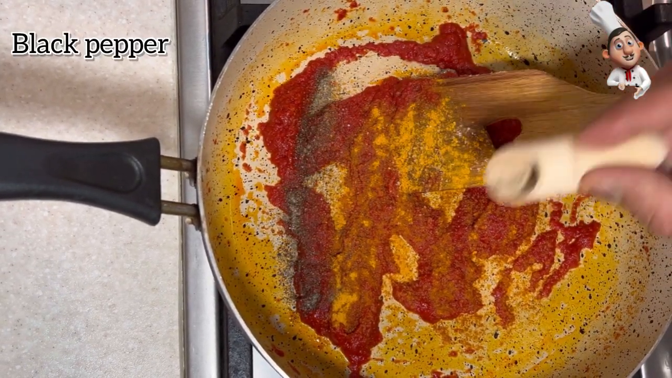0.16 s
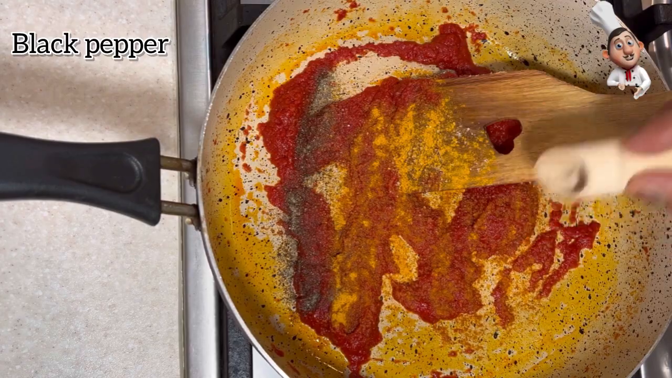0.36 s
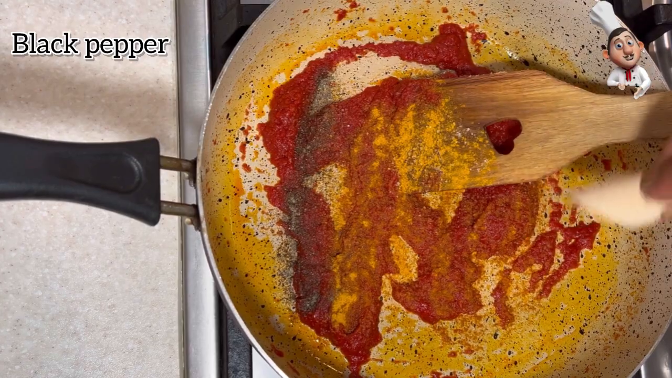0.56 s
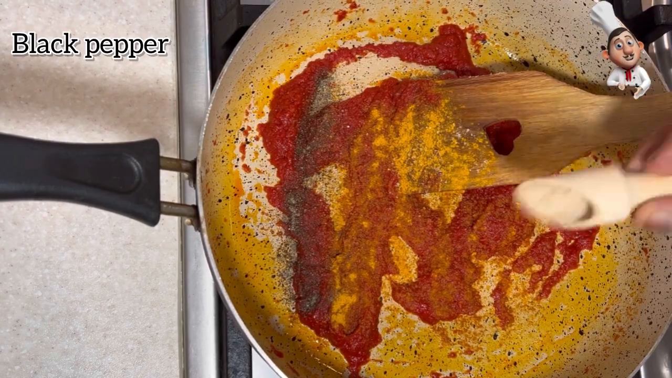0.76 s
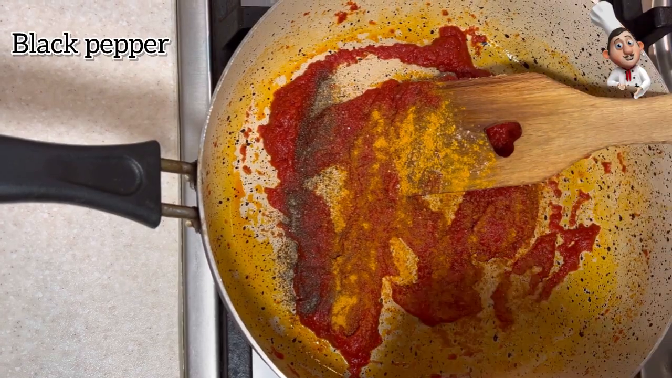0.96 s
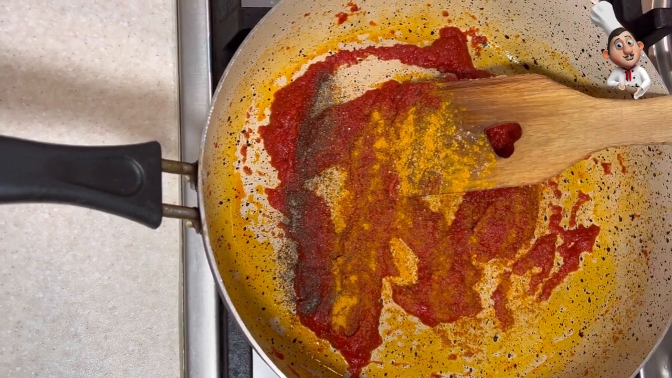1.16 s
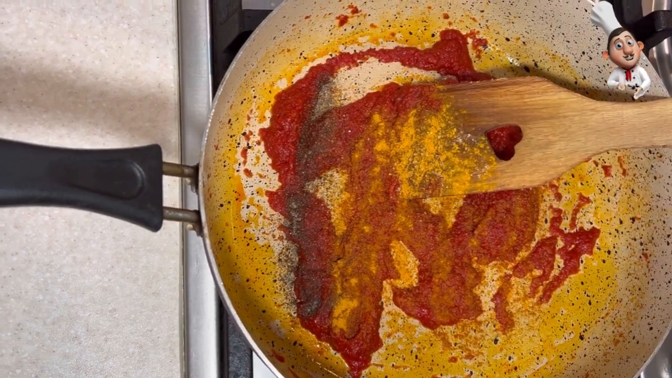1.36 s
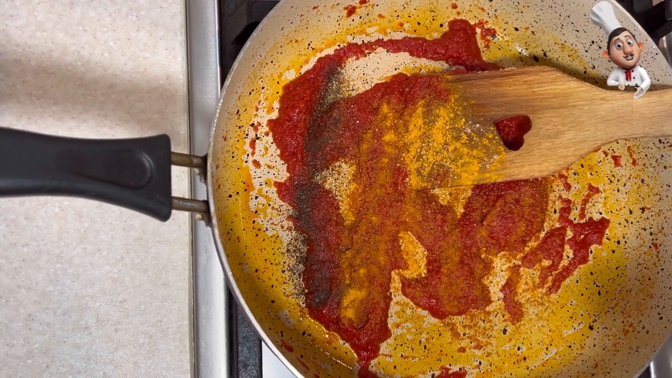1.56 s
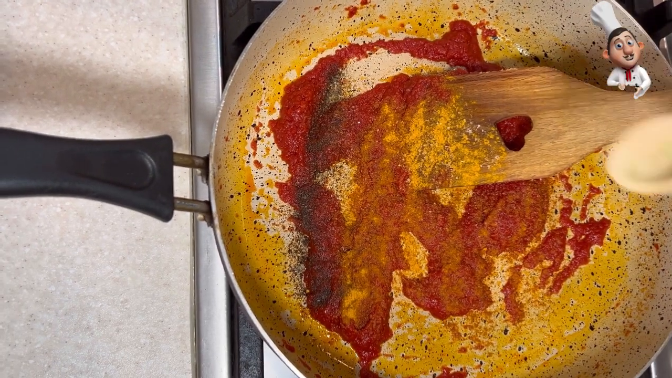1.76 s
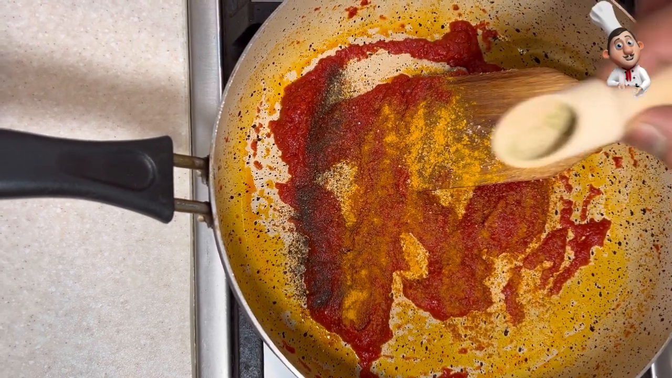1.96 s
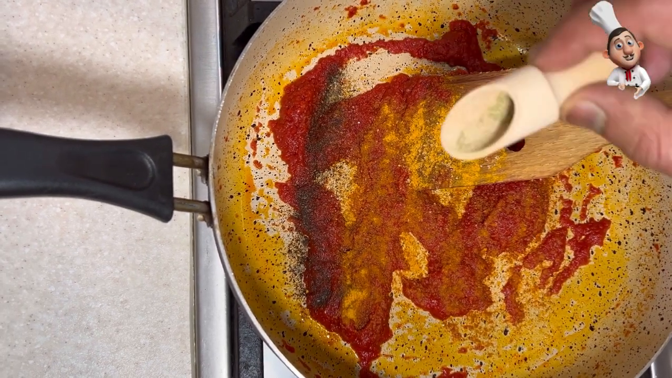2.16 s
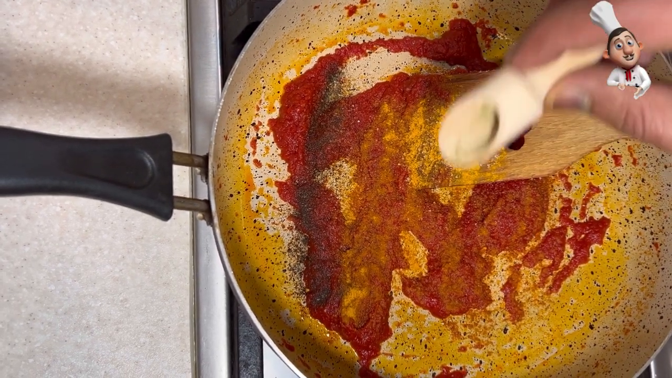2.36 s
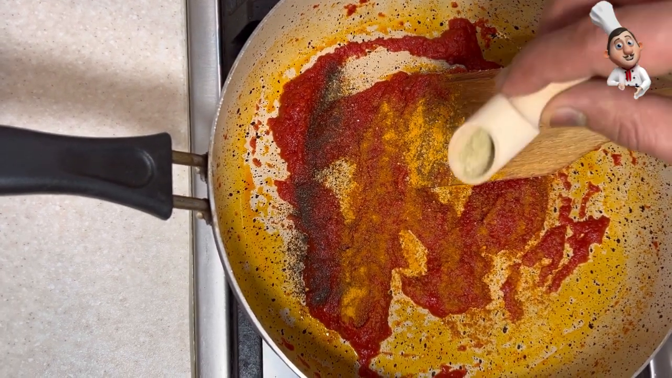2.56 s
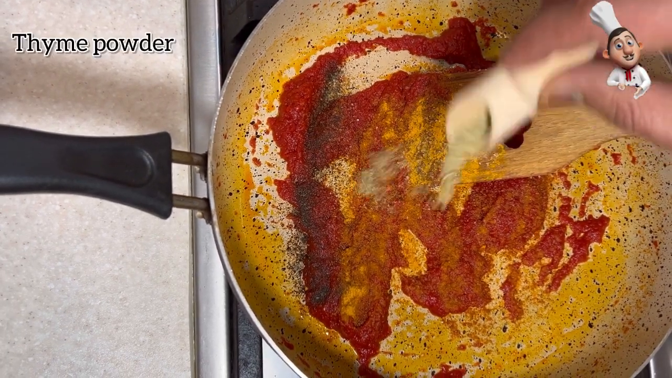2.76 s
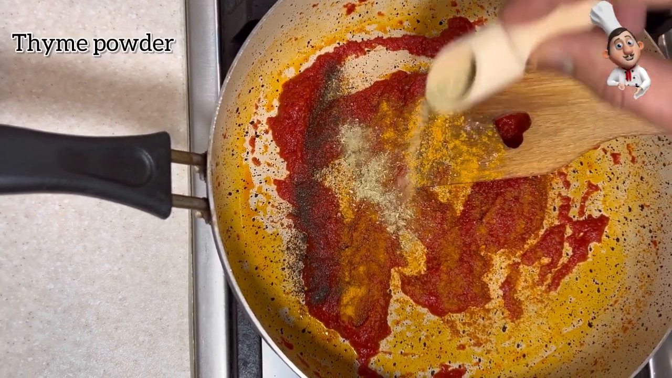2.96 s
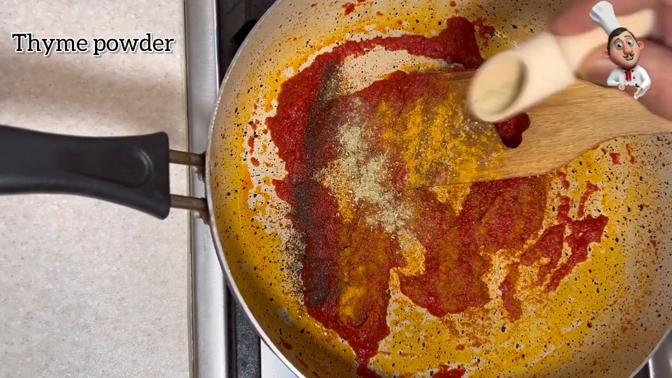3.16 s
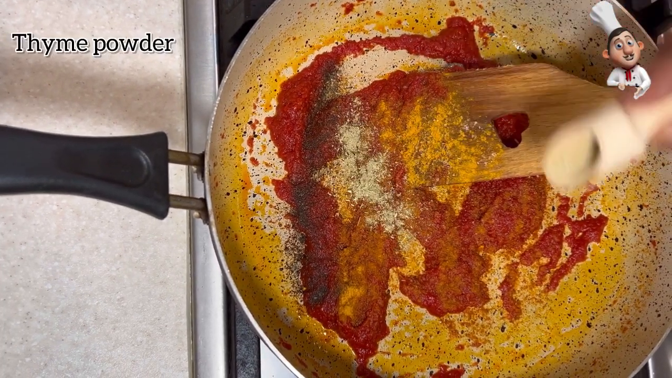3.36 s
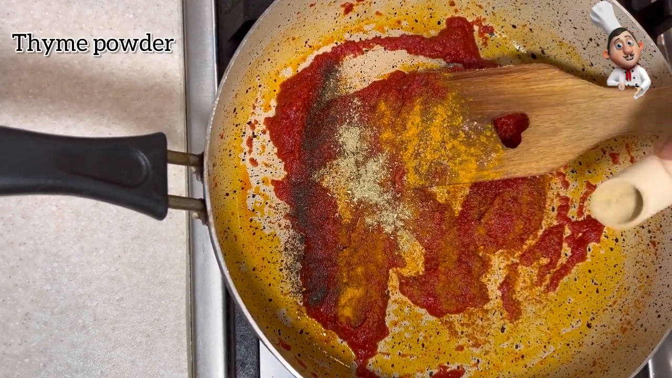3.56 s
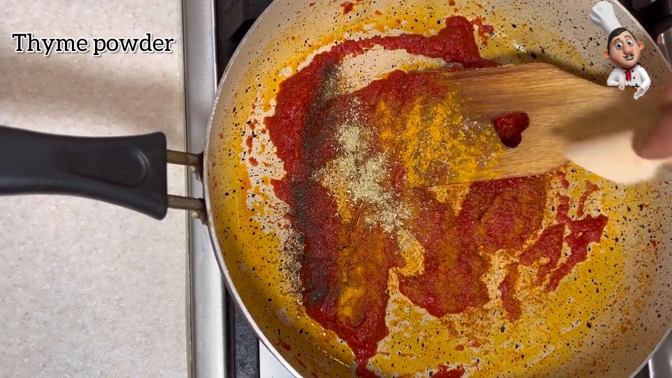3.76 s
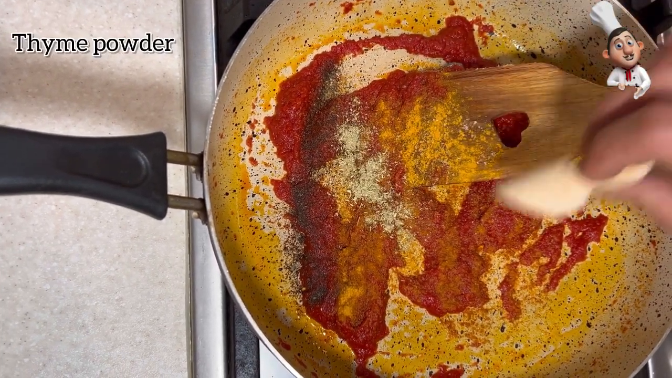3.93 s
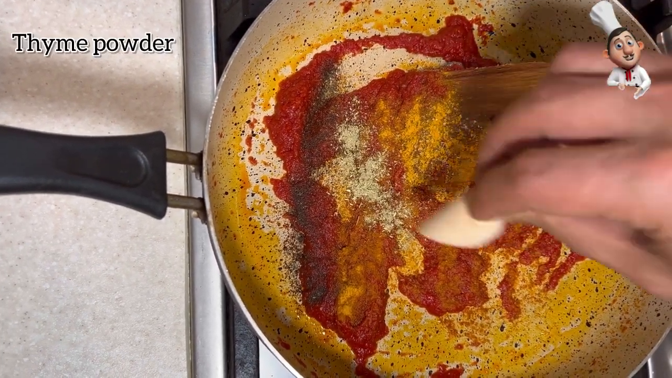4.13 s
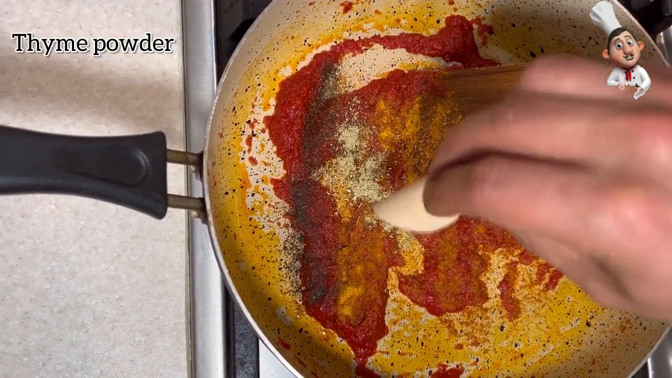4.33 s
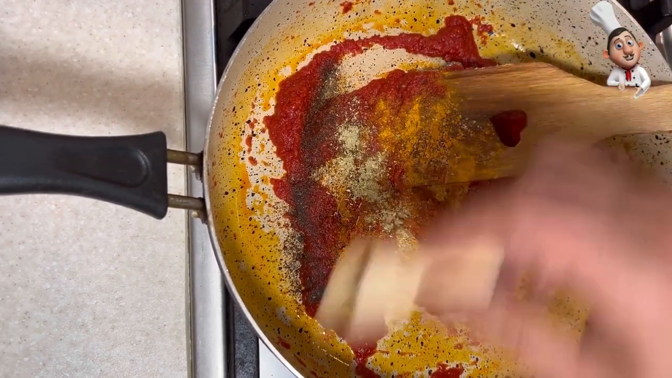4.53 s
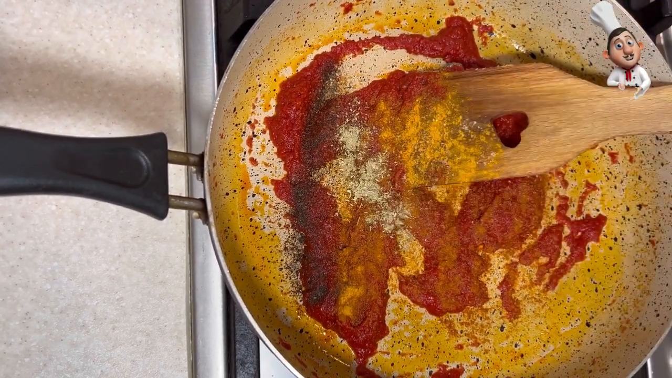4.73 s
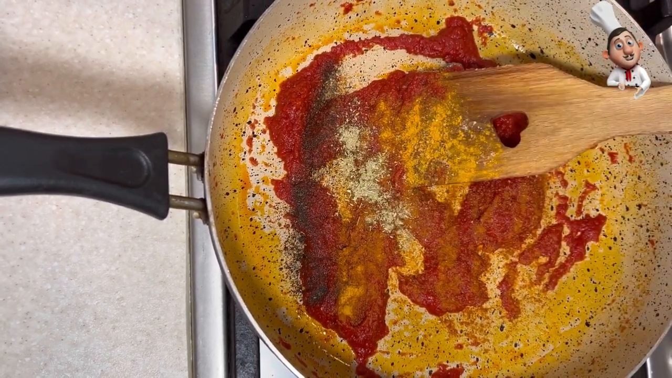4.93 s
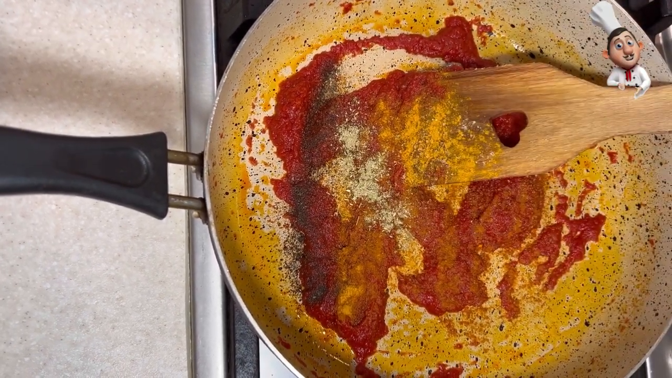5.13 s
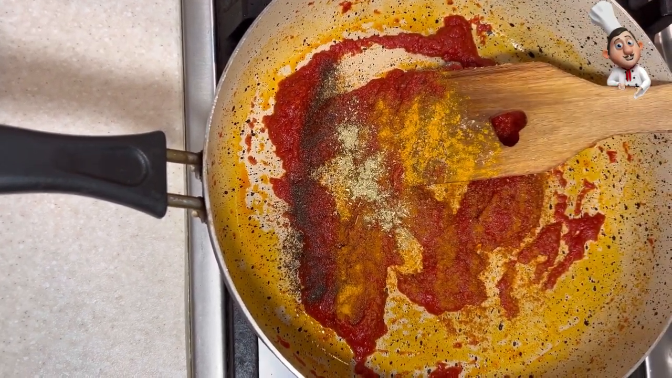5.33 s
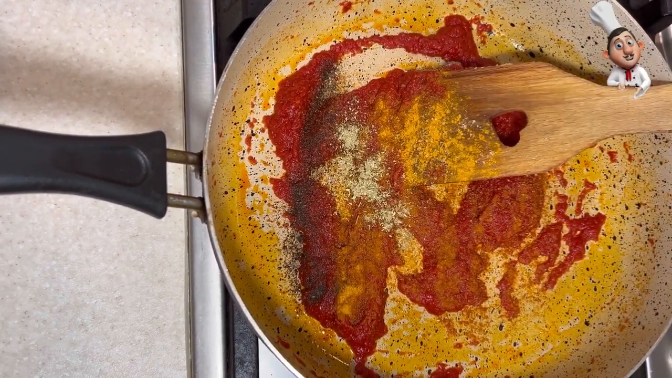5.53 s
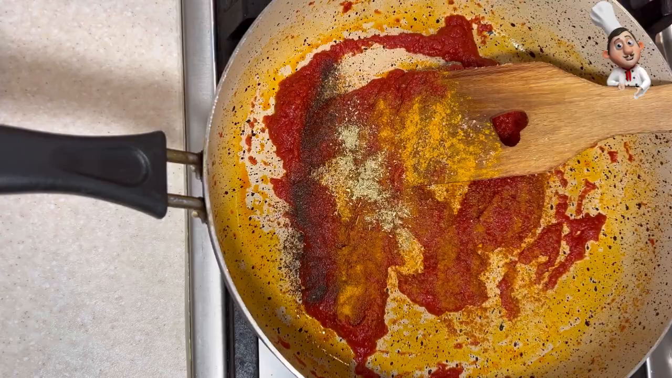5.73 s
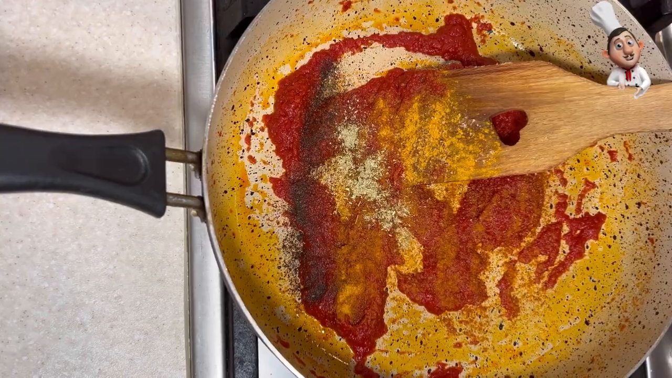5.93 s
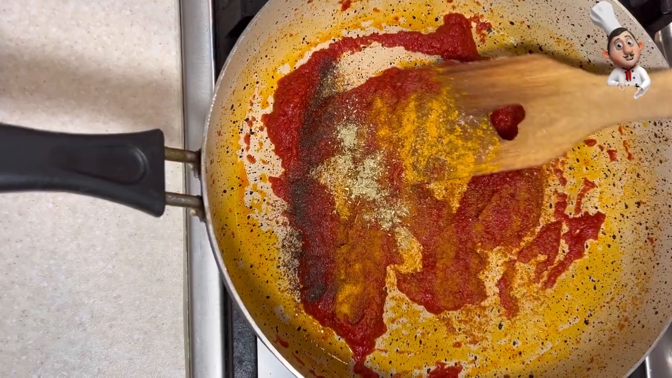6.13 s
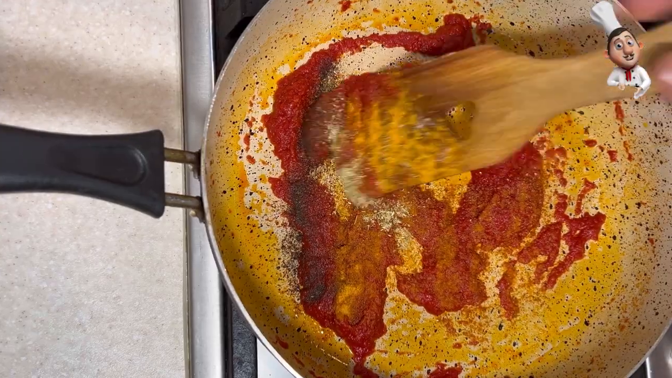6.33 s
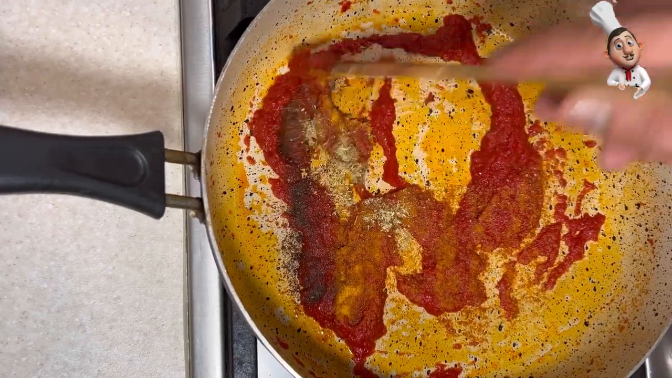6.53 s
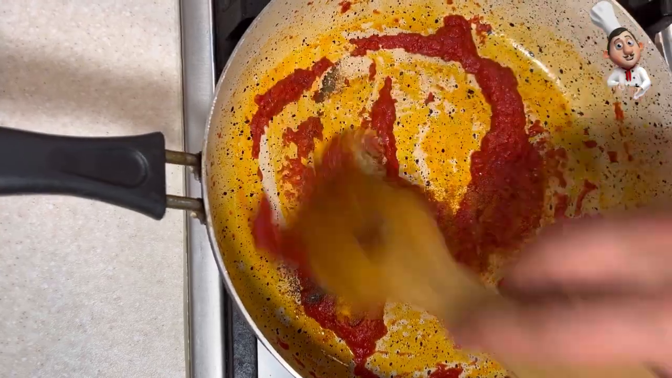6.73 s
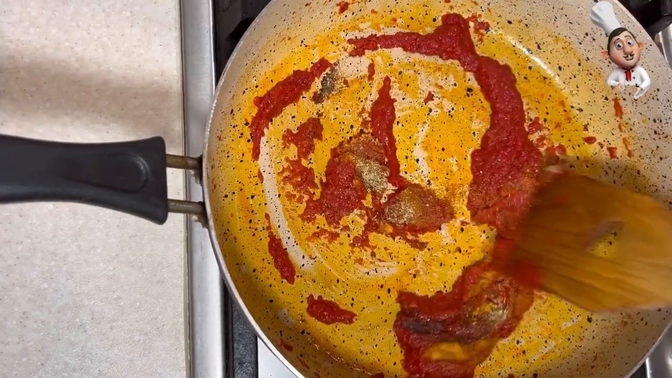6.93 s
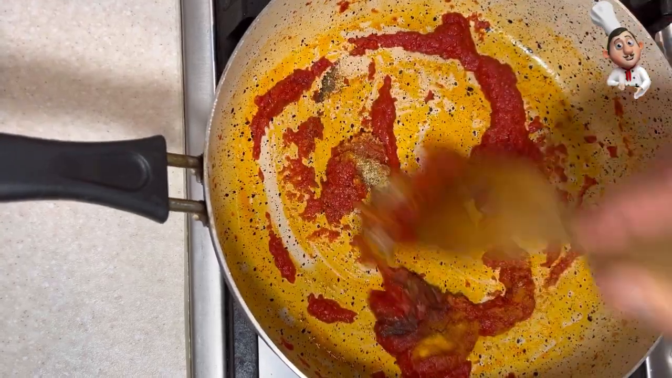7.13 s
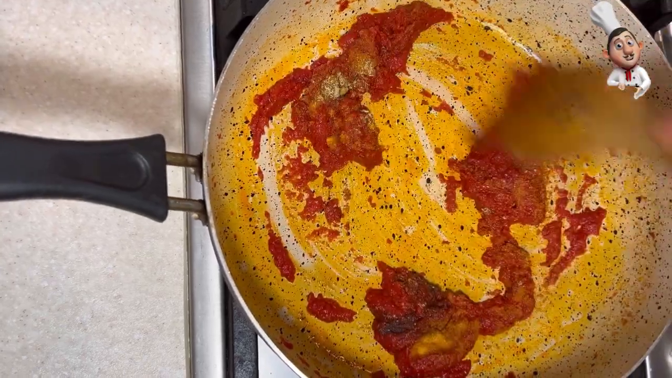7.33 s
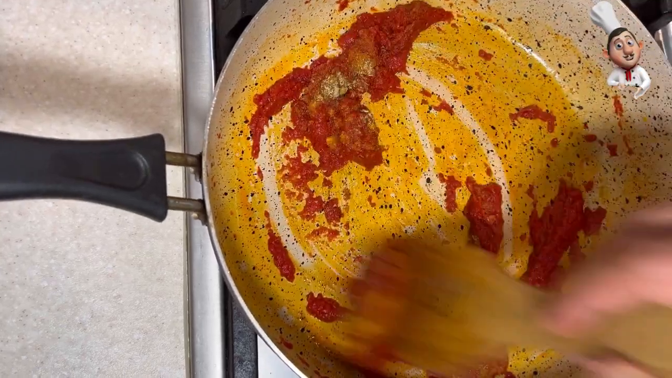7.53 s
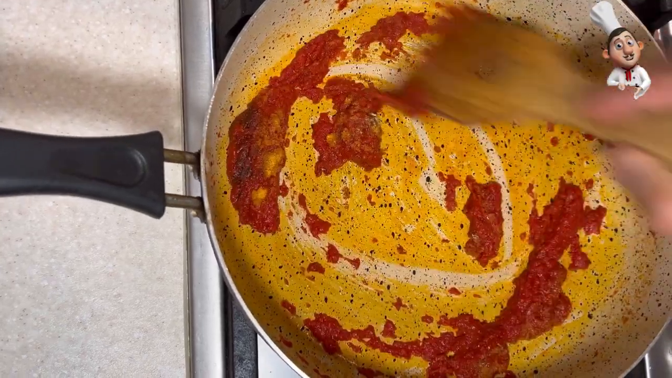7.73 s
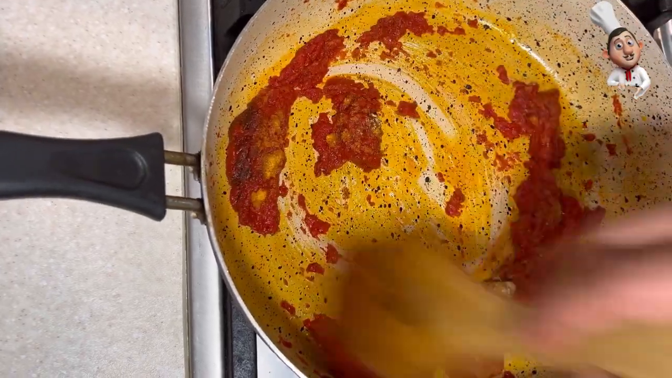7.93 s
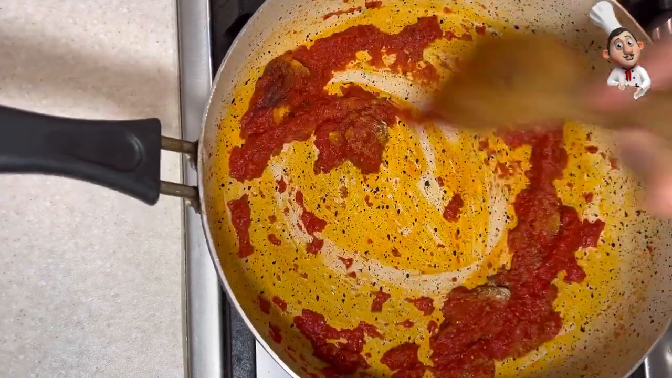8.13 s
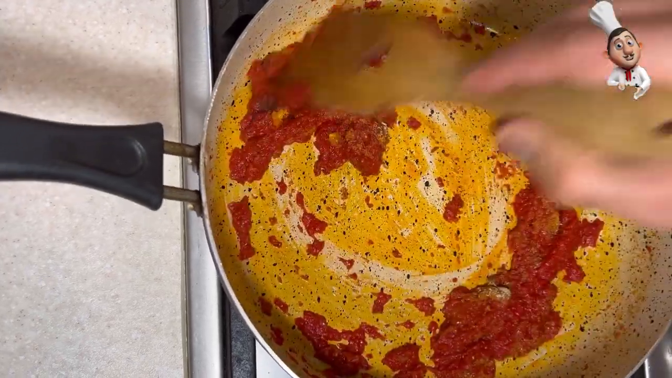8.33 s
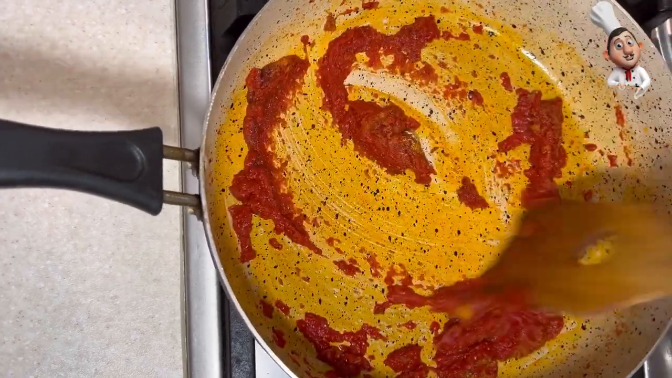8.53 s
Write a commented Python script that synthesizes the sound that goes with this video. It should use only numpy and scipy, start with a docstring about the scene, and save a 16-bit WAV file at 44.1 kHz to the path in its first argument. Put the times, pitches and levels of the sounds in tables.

```python
"""A wooden spatula knocks and scrapes through thick paste in a frying pan on a stove, close by.
Impacts and stick-slip friction excite the same damped pan modes; grit rasps under the blade, and the
rocking pan drives the stove top into a rumble. The stirring starts after about six seconds. Before it
only the kitchen is heard: a low drone and the hiss of tiny bubbles in oil, which both go on throughout,
and the clacks of a few things set down. Pan and clacks reverberate; two microphone ports pick it all up."""
import sys
import numpy as np
from scipy import signal
from scipy.fft import rfft, irfft
from scipy.io import wavfile
from scipy.ndimage import uniform_filter1d

SR = 44100
rng = np.random.default_rng(int(sys.argv[2]) if len(sys.argv) > 2 else 0)


def pcm_store(signal):
    """Save signal as 16-bit PCM."""
    levels = np.round(np.clip(np.atleast_2d(signal), -1, 1) * 32767)
    wavfile.write(sys.argv[1], SR, levels.astype(np.int16).T)


N = 383229

# spectrum of the drone: (frequency [Hz], relative density [dB])
DRONE_SPECTRUM = [(15, -56), (25, -9), (114, -3.5), (145, 2.5), (173, -21.5), (211, -9.5), (257, -18),
                  (313, -6.5), (397, -21), (566, -18.5), (663, -22), (1220, -27.5), (1400, -31.5),
                  (2170, -28.5), (2800, -31), (3640, -62), (6160, -120)]
# humps on that spectrum: (frequency [Hz], width [Hz], boost [dB])
DRONE_HUMPS = [(146, 39, 0), (299, 33, 4), (569.7, 10.6, 10), (2115, 45, 5.5)]
# spectrum of the frying hiss: (frequency [Hz], relative density [dB])
HISS_SPECTRUM = [(1180, -12.5), (2000, -14), (2180, -7.5), (2910, -10), (3340, -3.5), (4120, -1),
                 (5210, -2.5), (6470, 2.5), (9830, 0.5), (15100, 7), (16000, -17)]
# course of the hiss; turned paste fizzes harder: (time [s], level [dB])
HISS_LEVELS = [(0, -47), (3, -47), (4.3, -47.5), (5.3, -46.5), (6.2, -46.5), (6.6, -43.5), (6.95, -39),
               (7.2, -38.5), (7.7, -38.5), (8, -41.5), (8.69, -42.5)]
# pops of oil that stand out: (time [s], level [dB], pitch [Hz])
OIL_POPS = [(2.7305, -34, 8560), (2.8094, -37, 6660), (2.8594, -36, 11800), (3.0044, -35, 9010),
            (3.0394, -35, 7470), (3.2261, -36, 11300), (3.686, -35, 11800), (5.1173, -38, 12000),
            (6.6194, -32, 6590), (8.6657, -26, 8620)]
# things set down: (time [s], level [dB], pitch [Hz], spread [octaves], relative clink level [dB])
SET_DOWNS = [(1.6, -23, 460, 0.43, -60), (1.604, -31.5, 800, 0.7, -60), (1.623, -28.5, 420, 0.7, -60),
             (2.155, -36.5, 970, 0.89, -60), (5.201, -30.5, 1610, 0.68, -6), (5.221, -32, 1680, 0.68, -18),
             (5.289, -24.5, 1930, 0.75, -9.5), (5.304, -31, 2180, 0.96, -25),
             (5.344, -33.5, 1890, 0.88, -27)]
# their stronger resonances: (frequency [Hz], width [Hz], boost [dB])
CLACK_HUMPS = [(460, 70, 8), (800, 110, 10), (1400, 130, 9), (1800, 130, 9), (2200, 160, 10),
               (2950, 200, 6)]
# reverberation of the kitchen: (frequency [Hz], T60 [s])
REVERB_TIMES = [(200, 0.32), (1000, 0.43), (4000, 0.37), (12000, 0.62)]
# modes of the stove top: (frequency [Hz], width [Hz], relative level [dB])
STOVE_MODES = [(70, 4.4, -15.5), (96.2, 4.5, -6.5), (130.6, 24.6, -1), (148, 75, -23.5)]
# how hard the pan rocks: (time [s], drive level [dB])
ROCKING_LEVELS = [(6.24, -44), (6.28, -59), (6.36, -41), (6.62, -47), (6.64, -33), (6.73, -36), (6.74, -22),
                  (6.83, -28), (6.9, -34.5), (7.06, -33.5), (7.32, -58), (7.71, -43.5), (7.79, -29),
                  (7.8, -31.5), (8.03, -31.5), (8.05, -21), (8.4, -31), (8.44, -41), (8.5, -25.5),
                  (8.69, -36)]
# modes of pan and spatula, damped by the paste: (frequency [Hz], relative level [dB], T60 [s])
PAN_MODES = [(272, -13.5, 0.79), (376, -2.5, 0.1), (445, 5, 0.062), (589.5, -0.5, 0.081), (739, 0.5, 0.072),
             (772, 5, 0.044), (860, -27.5, 0.074), (950, 0, 0.027), (1138, -1.5, 0.05), (1235, -8, 0.068),
             (1607, -4.5, 0.039), (1724, -7, 0.06), (2108, -5.5, 0.073), (2330, -9.5, 0.052),
             (2700, -32, 0.058), (2940, -22, .05), (3250, -24, .05)]
# strokes of the blade: (time of peak [s], rise [s], fall [s], favoured pitch [Hz],
# low chatter level [dB], high chatter level [dB], rasp level [dB])
STROKES = [(6.36, .05, .12, 590, -47, -69, -45), (6.5, 0.02, 0.028, 680, -39.5, -65, -50),
           (6.612, 0.059, 0.044, 357, -56.5, -60, -48), (6.7, .03, 0.042, 390, -36, -63, -60),
           (6.813, 0.17, 0.07, 580, -29.5, -36, -32.5), (7.021, 0.032, 0.049, 720, -30.5, -32, -30.5),
           (7.075, 0.044, 0.094, 730, -21.5, -25, -34), (7.14, 0.19, .05, 740, -43, -47, -32),
           (7.235, .06, .1, 795, -42, -37, -32), (7.39, 0.067, 0.057, 500, -40.5, -36, -37),
           (7.49, 0.068, 0.08, 620, -33, -42, -38), (7.535, 0.06, 0.086, 610, -40.5, -32.5, -33.5),
           (7.63, 0.23, 0.098, 710, -61, -49, -39), (7.725, 0.015, 0.042, 405, -37, -42.5, -29.5),
           (7.799, 0.043, 0.067, 600, -28, -27, -20.5), (7.998, 0.055, 0.035, 423, -32, -39.5, -52),
           (8.043, .02, 0.076, 500, -38, -28.5, -30), (8.141, 0.024, 0.041, 434, -38, -47, -31),
           (8.26, 0.017, 0.045, 478, -32, -35.5, -44), (8.36, .04, 0.053, 453, -36, -51, -55),
           (8.39, .015, 0.081, 750, -52, -45, -39), (8.474, 0.098, 0.041, 715, -42, -29.5, -20),
           (8.51, .03, .04, 526, -24, -32.5, -46), (8.57, .02, 0.14, 483, -38.5, -43, -56)]
# spectrum of the rasp: (frequency [Hz], relative density [dB])
RASP_SPECTRUM = [(1500, -12), (2500, 0), (3400, -7), (4900, -7.5), (6500, -5.5), (8600, -3.5),
                 (10000, -9.5), (12000, -4.5), (14000, -6.5), (15200, -13)]
# humps on that spectrum: (frequency [Hz], width [Hz], boost [dB])
RASP_HUMPS = [(3380, 130, 7), (4080, 190, 8.5), (4880, 130, 13), (5620, 200, 10.5), (6410, 570, 9.5),
              (7850, 300, 4.5), (8760, 150, 7)]
# blows and small rubs of the spatula: (time [s], level [dB], pitch favoured by the spot touched [Hz], spread
# [octaves],
BLOWS = [(6.34, -36, 589, .59, -16, -6), (6.492, -34.5, 610, 0.18, -35.5, -17),
         (6.669, -26, 401, 1, -16, -25), (6.735, -10, 660, 1, -12, -1.5), (6.992, -20, 714, 0.83, -23, -14),
         (7.047, -19, 750, 0.29, -3, -16), (7.179, -26, 765, 0.51, -9, -8),
         (7.374, -33, 1110, 0.39, -16, -15), (7.399, -29.5, 565, .58, -5, -12),
         (7.449, -31, 759, 0.48, -6, -10), (7.475, -27.5, 590, 0.15, -15, -15),
         (7.517, -28.5, 590, 0.41, -6, -10), (7.706, -27.5, 390, .88, -14, -11),
         (7.72, -27, 388, 0.63, -11, 8.5), (7.767, -8.5, 696, 1, -27, -2), (7.869, -24, 821, .91, -14, -17),
         (7.924, -10.5, 490, 1, -18, -30), (8.033, -16.5, 720, 0.68, -4.5, -3),
         (8.086, -15.5, 774, 0.89, -8.5, -29), (8.17, -7, 656, 1, -20, -5), (8.199, -25, 759, .4, 1, -22),
         (8.226, -22.5, 775, 0.92, -11, -23), (8.246, -16.5, 460, 1, -17, -16),
         (8.286, -20, 456, 1, -15, -5.5), (8.332, -20.5, 452, 1, -5, -22), (8.483, -8.5, 580, 1, -7.5, -5),
         (8.55, -20, 401, 1, -10, -28), (8.638, -26, 468, .7, -2.5, -7), (8.678, -3, 670, 0.28, -32, -24)]
# likeness of noise at the two microphone ports: (frequency [Hz], correlation [0 to 1])
PORT_CORRELATION = [(60, 1.0), (150, .995), (350, .92), (1000, .8), (2100, .87), (2800, .35), (3500, .3),
                    (4800, .45), (5600, .8), (15000, .8)]
# level difference of the ports: (frequency [Hz], left minus right [dB])
PORT_LEVEL_GAP = [(150, 0), (280, -.9), (600, 1.4), (2500, .9), (5000, .5), (9000, -.2), (15000, 0)]
# phase difference of the ports: (frequency [Hz], lag of the left [rad])
PORT_PHASE_GAP = [(1000, 0), (2000, -.05), (2800, -.3), (4100, .2), (5500, 1.1), (7000, 1.3), (11000, 1.4),
                  (15500, 1.7)]


def amp(db):
    """Amplitude ratio of a level in decibels."""
    return 10 ** (np.asarray(db) / 20)


def unit_rms(x):
    """Normalisation to a mean square of one."""
    return x / np.sqrt(np.mean(x ** 2) + 1e-20)


def curve(points, hz):
    """Interpolation of a table on a log-frequency axis."""
    f, value = np.transpose(points)
    return np.interp(np.log(hz + 1), np.log(f + 1), value)


def humps(peaks, hz):
    """Sum of Lorentzian resonance humps, in dB."""
    return sum(db / (1 + (2 * (hz - f) / width) ** 2) for f, width, db in peaks)


def bell(hz, centre_hz, octaves):
    """Gaussian weight over log frequency."""
    return np.exp(-.5 * (np.log2(hz / centre_hz) / np.maximum(octaves, .01)) ** 2)


def add(mix, s, sound):
    """Superposition of a sound on the mix at s seconds."""
    part = mix[round(s * SR):][:len(sound)]
    part += sound[:len(part)]


def resonator(x, hz, width):
    """A damped two-pole oscillator, scaled to pass white noise at equal power."""
    r, w = np.exp(-np.pi * width / SR), 2 * np.pi * hz / SR
    response = signal.lfilter([0, r * np.sin(w)], [1, -2 * r * np.cos(w), r * r], x)
    return response * np.sqrt(4 * np.pi * width / SR)


def clicks(per_s, spread_db):
    """Shot noise: impulses of random time and sign, a few much larger than the rest."""
    size = amp(spread_db * np.minimum(rng.exponential(1, N), 5)) * rng.choice([-1., 1.], N)
    return unit_rms(size * (rng.random(N) < per_s / SR))


def wander(span, length=N):
    """Slow fluctuation: a moving average of noise over span samples."""
    return unit_rms(uniform_filter1d(rng.standard_normal(length), size=span))


def burst(noise, centre_hz, octaves, t60):
    """A band of noise in exponential decay."""
    hz = np.fft.rfftfreq(len(noise), 1 / SR) + 1
    band = irfft(rfft(noise) * bell(hz, centre_hz, octaves), len(noise))
    return unit_rms(band) * amp(-60 * np.arange(len(noise)) / SR / t60)


def filtered(x, gain, size):
    """Filtering by a complex gain over frequency, in frames of size samples."""
    hz, _, spectra = signal.stft(x, SR, nperseg=size)
    return signal.istft(spectra * gain(hz)[..., None], SR, nperseg=size)[1][..., :N]


def stereo(left, independent):
    """Partial coherence: the right port hears a share of the left's noise, plus noise of its own."""
    share = lambda hz: np.clip(curve(PORT_CORRELATION, hz), 0, 1)
    private = filtered(independent, lambda hz: np.sqrt(1 - share(hz) ** 2), size=1024)
    return np.array([left, filtered(left, share, size=1024) + private])


def drone(level_db=-46):
    """Stationary coloured noise: the low sound of the kitchen, with a few humps in its spectrum."""
    colour = lambda hz: amp(curve(DRONE_SPECTRUM, hz) + humps(DRONE_HUMPS, hz))
    noise = stereo(*rng.standard_normal((2, N)))
    return amp(level_db) * unit_rms(filtered(noise, colour, size=4096))


def frying(flicker_db=0.86, flat_above_hz=15200):
    """Shot noise of tiny bubbles in oil merges into a flickering hiss; a few single pops stand out."""
    fizz = stereo(clicks(per_s=9000, spread_db=2.0), clicks(per_s=9000, spread_db=7.3))
    colour = lambda hz: amp(curve(HISS_SPECTRUM, np.minimum(hz, flat_above_hz)))
    hiss = unit_rms(filtered(fizz, colour, size=512))
    level_db = np.interp(np.arange(N) / SR, *np.transpose(HISS_LEVELS)) + flicker_db * wander(1500)
    pops = np.zeros(N)
    for (s, db, hz), noise in zip(OIL_POPS, rng.standard_normal((len(OIL_POPS), 600))):
        add(pops, s, amp(db) * burst(noise, hz, octaves=0.51, t60=0.015) / 2)
    return pops + amp(level_db) * hiss


def clacks(t60_at_1khz=0.061, attack_s=.0012):
    """Free vibration of things set down further off in the kitchen: fast-dying wooden modes, some with a glassy
    clink."""
    out, t = np.zeros(N), np.arange(6000) / SR
    attack = 1 - np.exp(-t / attack_s)
    for s, db, centre_hz, octaves, clink_db in SET_DOWNS:
        noise = rng.standard_normal(len(t))
        hz = np.geomspace(300, 8000, num=100)[:, None] * (1 + 0.013 * noise[:100, None])
        phase = 1.45 * noise[100:200, None]
        decay_db = 60 * t / t60_at_1khz * (hz / 1000) ** .15  # lower modes ring longer
        envelopes = bell(hz, centre_hz, octaves) * amp(humps(CLACK_HUMPS, hz) - decay_db)
        body = (envelopes * np.sin(2 * np.pi * hz * t + phase)).sum(0)
        clink = amp(clink_db) * burst(noise, 4350, octaves=0.08, t60=.06)
        add(out, s, amp(db) * (.45 * body / body[:500].std() + clink) * attack)
    return out


def reflections(x, t60_share, low_hz):
    """Reverberation: sparse echoes, different on each side, die in a share of each band's room T60."""
    taps = np.zeros((2, SR // 2))
    slots = np.arange(200, SR // 2 - 20, 20)
    arrivals = slots + rng.integers(0, 20, (2, len(slots)))
    np.put_along_axis(taps, arrivals, rng.choice([-1., 1.], arrivals.shape), 1)
    hz, t, spectra = signal.stft(taps, SR, nperseg=256)
    decay = amp(-60 * t / t60_share / curve(REVERB_TIMES, hz)[:, None])
    tail = signal.istft(spectra * (hz[:, None] > low_hz) * decay, SR, nperseg=256)[1]
    return signal.fftconvolve(x[None], tail / np.linalg.norm(tail[0]), axes=1)[:, :N]


def contact(start_s=6.24, ramp_s=0.014):
    """Friction needs contact: 0 while the blade is off the pan, 1 once it is on."""
    return np.clip((np.arange(N) / SR - start_s) / ramp_s, 0, 1)


def stove_rumble():
    """Forced vibration: the pan rocks on its support and drives the modes of the stove top."""
    rocking_db = np.interp(np.arange(N) / SR, *np.transpose(ROCKING_LEVELS))
    force = rng.standard_normal(N) * contact() * amp(rocking_db)
    shake = sum(amp(db) * resonator(force, hz, width) for hz, width, db in STOVE_MODES)
    return signal.sosfilt(signal.butter(3, [48, 200], "band", fs=SR, output="sos"), shake)


def blade_motion(skid_delay_s=0.0092, skid_fall_s=0.043, skid_pitch_ratio=0.86):
    """Incoherent addition: strokes and a skid after each blow sum in power. Gives 3 levels, 2 pitches."""
    skid_db = np.array([-11.5, -21, -30])  # low chatter, high chatter and rasp, relative to the blow
    skids = [(s + skid_delay_s, skid_delay_s / 2, skid_fall_s, skid_pitch_ratio * hz, *(db + skid_db))
             for s, db, hz, *_ in BLOWS]
    columns, t = np.array(STROKES + skids).T[..., None], np.arange(0, N, 32) / SR
    (peak_s, rise, fall, hz), peak_db = columns[:4], columns[4:]
    from_peak = np.where(t < peak_s, (peak_s - t) / rise, (t - peak_s) / fall)
    fade_db = -21.5 * np.minimum(from_peak, 3) ** 1.21
    power = amp(2 * (peak_db + fade_db))
    pitches = (power[:2] * hz).sum(1) / power[:2].sum(1)  # the loudest movement dominates
    levels_db = 10 * np.log10(power.sum(1))
    return [np.interp(np.arange(N) / SR, t, control) for control in (*levels_db, *pitches)]


def chatter(modes, level_db, centre_hz, octaves, damping):
    """Stick-slip friction drives pan modes; the blade's angle selects them, its pressure damps them."""
    on, out = contact() > 0, np.zeros(N)
    slips = clicks(per_s=1200, spread_db=3.8)[on]
    weights = [amp(db) * bell(hz, centre_hz[on], octaves) for hz, db, _ in modes]
    grip_db = 2.0 * wander(350, len(slips))  # the grip comes and goes
    force = contact()[on] * amp(level_db[on] + grip_db) / np.sqrt(sum(w ** 2 for w in weights) + 1e-9)
    for (hz, _, t60), weight in zip(modes, weights):
        drive = 0.54 * slips + 0.68 * rng.standard_normal(len(slips))
        out[on] += resonator(drive * weight * force, hz, width=damping / t60)
    return out


def rasp(level_db, clump_db=1.9, patch_db=3.1):
    """Friction noise of grit and wet paste under the edge: clumped clicks, coloured in shifting patches."""
    clumps = amp(clump_db * wander(400))
    grit = stereo(clicks(per_s=9000, spread_db=1.96) * clumps, clicks(per_s=9000, spread_db=0.71) * clumps)
    hz, t, spectra = signal.stft(grit, SR, nperseg=512)
    patches = uniform_filter1d(rng.standard_normal((len(t), len(hz))), size=5, axis=0)
    patches = uniform_filter1d(patches, size=8, axis=1)
    colour_db = curve(RASP_SPECTRUM, hz) + humps(RASP_HUMPS, hz) + patch_db * unit_rms(patches)
    coloured = signal.istft(spectra * amp(colour_db.T), SR, nperseg=512)[1][:, :N]
    return contact() * amp(level_db) * unit_rms(coloured)


def knocks(ring_share=0.86, attack_s=0.00049):
    """Impact excitation: each blow or small rub rings the pan modes its spot favours and thumps the stove top."""
    out, t = np.zeros(N), np.arange(SR // 4) / SR
    hz, mode_db, t60 = np.transpose(PAN_MODES)[..., None]
    envelopes = amp(mode_db - 60 * t / t60 / ring_share)  # the blade stays on and shortens the ring
    thump = sum(amp(db) * np.exp(-3. * width * t) * np.sin(2 * np.pi * f * t)
                for f, width, db in STOVE_MODES)
    for s, db, centre_hz, octaves, crack_db, tick_db in BLOWS:
        noise = rng.standard_normal(len(t))
        loaded_hz = hz * (1 + 0.012 * noise[-len(hz):, None])  # the paste lies differently at every blow
        modes = envelopes * bell(hz, centre_hz, octaves) * np.sin(2 * np.pi * loaded_hz * t)
        body = modes.sum(0) * (1 - np.exp(-t / attack_s))
        crack = amp(crack_db) * burst(noise, 1900, octaves=.5, t60=.05)  # the wood
        tick = amp(tick_db) * burst(noise, 7500, octaves=.7, t60=.035)
        thud = amp(-10.5) * burst(noise, 289, octaves=0.5, t60=0.079)  # the blade pushes into the paste
        blow = body / abs(body).max() + (crack + tick + thud) / 2
        add(out, s, amp(db) * blow + amp(-40 + .3 * db) * thump)  # the thump grows less than the blow
    return out


def scene():
    """Superposition: pan and clacks with their reflections, over rasp, rumble, drone and frying."""
    low_db, high_db, rasp_db, low_hz, high_base_hz = blade_motion()
    low_chatter = chatter(PAN_MODES[:7], low_db, low_hz, octaves=0.21, damping=3.03)
    high_chatter = chatter(PAN_MODES[7:], high_db, 2.52 * high_base_hz, octaves=0.56, damping=4.6)
    pan = knocks() + low_chatter + high_chatter
    set_down = clacks()
    room = reflections(amp(-11.5) * pan + amp(0.5) * set_down, t60_share=1, low_hz=300)
    counter_and_wall = reflections(amp(-7.5) * pan, t60_share=0.13, low_hz=450)
    return pan + set_down + room + counter_and_wall + rasp(rasp_db) + stove_rumble() + drone() + frying()


def ports(x):
    """Two-point reception: sound reaches the microphone ports with a difference of level and phase."""
    side = np.array([[.5], [-.5]])
    balance = lambda hz: amp(side * curve(PORT_LEVEL_GAP, hz))
    lag = lambda hz: np.exp(-1j * side * curve(PORT_PHASE_GAP, hz))
    return filtered(x, lambda hz: balance(hz) * lag(hz), size=1024)


def record(dry):
    """Band-limited pickup: two ports, the microphone's bass roll-off, a brief dip in level, a low-pass."""
    dip_s, dip_width_s, dip_db = 1.42, .006, -14
    dip = amp(dip_db * np.exp(-.5 * ((np.arange(N) / SR - dip_s) / dip_width_s) ** 2))
    thinned = signal.sosfilt(signal.butter(2, 45, "high", fs=SR, output="sos"), ports(dry))
    low_pass = signal.firwin(511, 16050, window=("kaiser", 9), fs=SR)
    return signal.oaconvolve(thinned * dip, low_pass[None], "same")


dry = scene()
out = record(dry)
pcm_store(out)
```